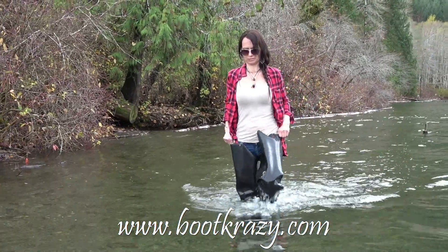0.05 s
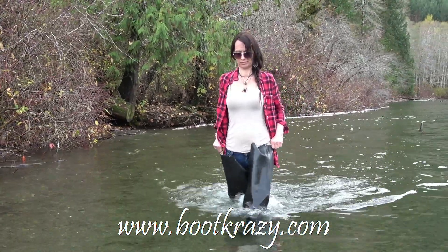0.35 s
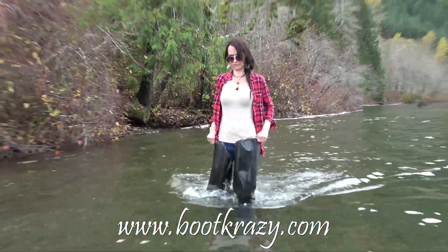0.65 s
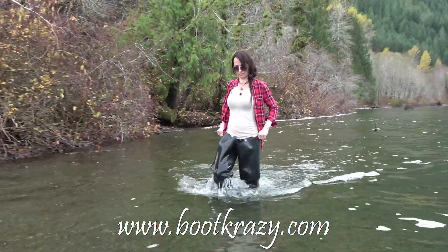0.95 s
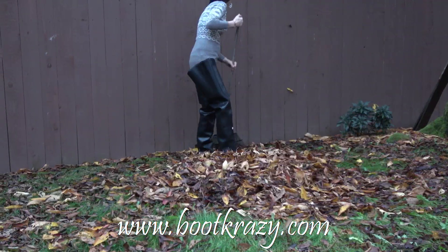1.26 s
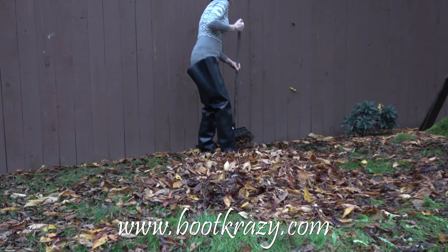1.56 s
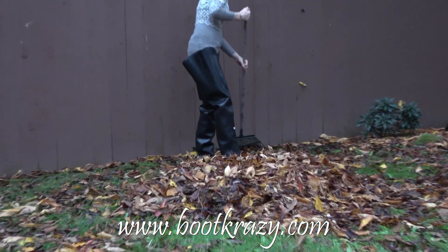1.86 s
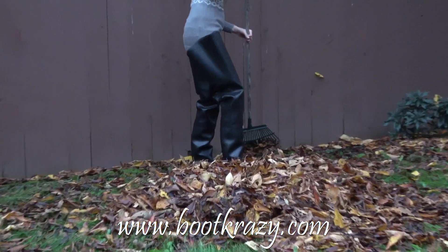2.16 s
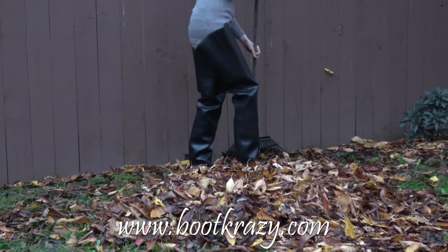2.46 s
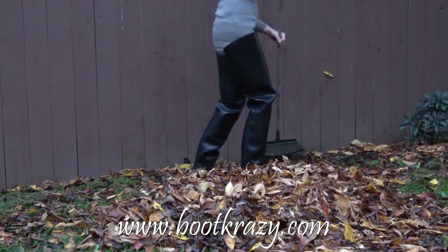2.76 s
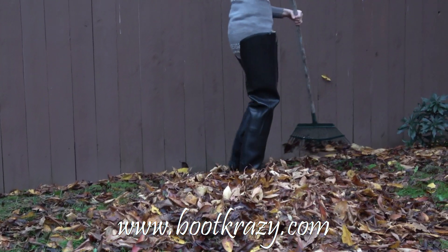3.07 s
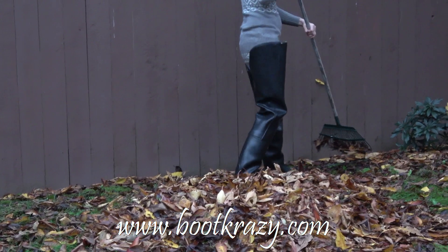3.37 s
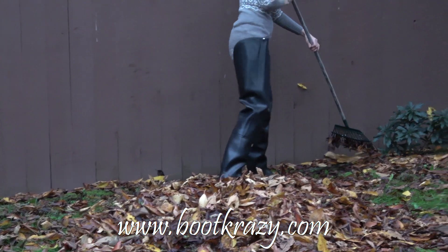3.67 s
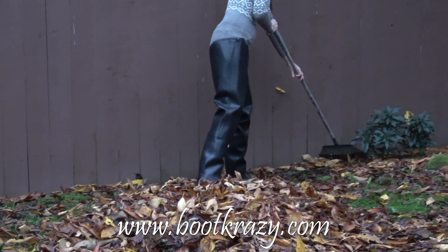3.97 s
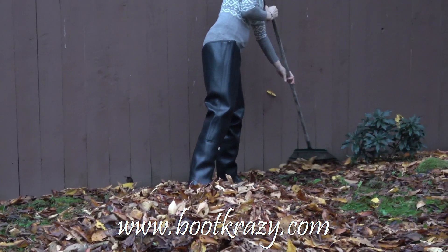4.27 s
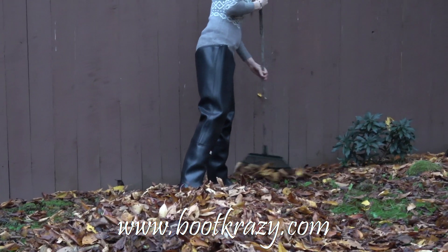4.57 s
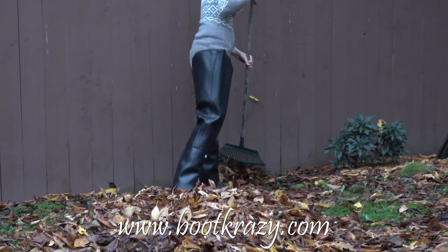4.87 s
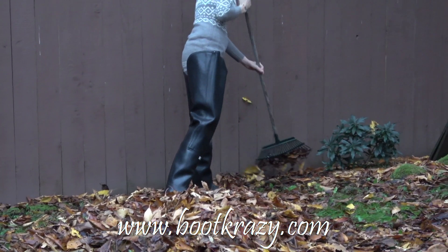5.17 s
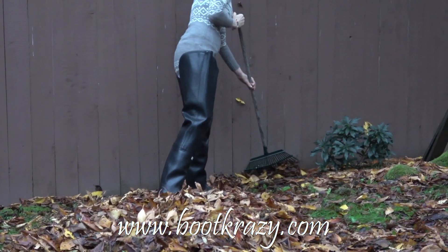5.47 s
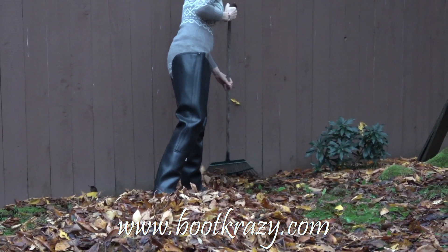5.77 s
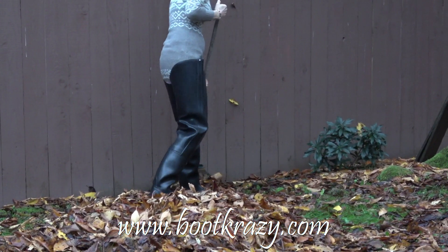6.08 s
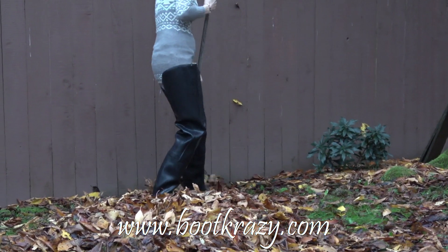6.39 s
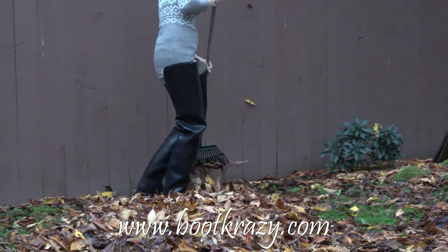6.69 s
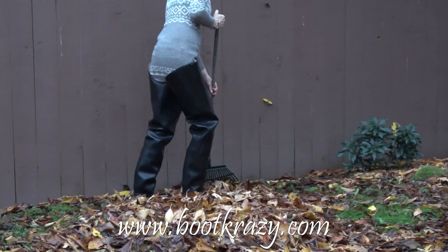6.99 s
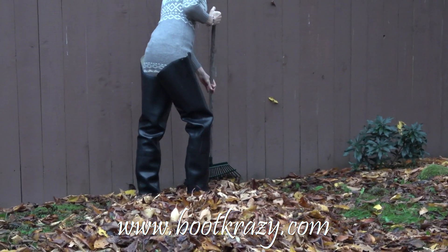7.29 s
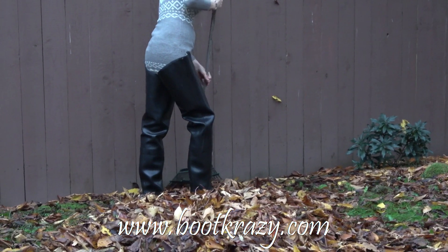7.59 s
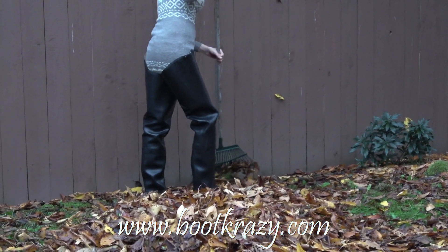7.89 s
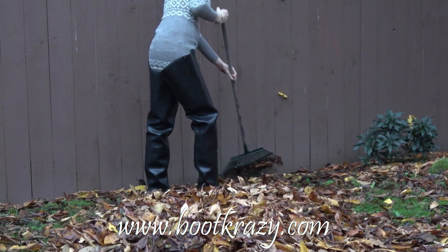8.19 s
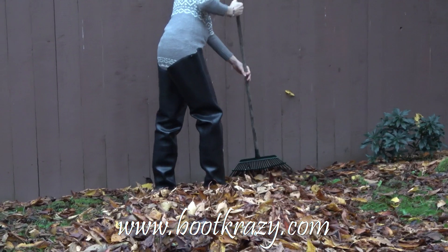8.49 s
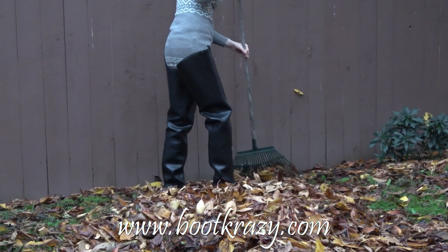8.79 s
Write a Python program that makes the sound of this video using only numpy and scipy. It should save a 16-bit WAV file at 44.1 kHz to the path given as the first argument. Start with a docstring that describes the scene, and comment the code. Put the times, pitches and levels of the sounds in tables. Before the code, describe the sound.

Brief splashing of legs wading through water, then a rake scraping through dry leaves in uneven strokes outdoors.

```python
"""First someone wades through a shallow river: trapped bubbles ring, spray flies and drops fall back.
After a second the scene cuts to a yard, where air rushes over a faint distant hum. A fan rake is
dragged through dry leaves in uneven strokes: leaves fracture, tines chatter, snap free and scrape
the soil. Between strokes the rake head and rubber boots land in the litter, once with a low boom.
To the end, a wooden fence reflects the work."""
import sys
import numpy as np
from scipy import signal
from scipy.fft import rfft, irfft, next_fast_len
from scipy.io import wavfile
from scipy.ndimage import uniform_filter1d

SR = 44100
rng = np.random.default_rng(int(sys.argv[2]) if len(sys.argv) > 2 else 0)


def master_out(mix):
    """Clip the mix to full scale and print it as 16-bit PCM to the path in sys.argv[1]."""
    frames = np.transpose(np.atleast_2d(mix))
    ceiling = np.clip(frames, -1, 1)
    pcm = np.round(ceiling * 32767).astype(np.int16)
    wavfile.write(sys.argv[1], SR, pcm)


N = 394254
TIME = np.arange(N) / SR
CUT_S, EDGE_HZ = 1.05, 15850  # end of the river scene; upper band limit

# Spectra of distant air, churned water and spray: f/Hz, level/dB
AIR_SPECTRUM = [(12, -29), (20, -13), (53, 1), (133, -5.5), (172, -10.5), (335, -13.5), (510, -13),
                (637, -8), (996, -18.5), (1250, -13.5), (1350, -21), (1650, -22), (1890, -27.5),
                (10100, -33), (15800, -44)]
CHURN_SPECTRUM = [(41, -41), (70, -11), (146, -1), (277, -3.5), (417, -6), (499, -1), (1520, -5),
                  (1850, -11), (2560, -3.5), (2830, -17), (3500, -28), (4550, -34), (7700, -120)]
SPRAY_SPECTRUM = [(1880, -3), (3200, -1.5), (5040, -10), (7130, -11), (9070, -14.5), (13500, -20.5),
                  (15800, -27)]
# Spectra of raked leaves, scraped soil, struck soil and crushed litter: f/Hz, level/dB
LEAF_SPECTRUM = [(1940, -57), (3300, -7), (3550, -11.5), (4370, 3), (4950, -4), (5540, 1), (7680, 0.5),
                 (11800, -4), (14400, -10.5), (15800, -17)]
SOIL_SPECTRUM = [(65, -49), (110, -26), (167, -5), (403, -14.5), (537, -20), (598, -11), (768, -18.5),
                 (929, -10), (1900, -5.5), (2470, -33), (4180, -120)]
THUD_SPECTRUM = [(40, -22), (110, 2.5), (185, -4.5), (290, -0.5), (450, -21), (900, -20), (2000, -63)]
CRUNCH_SPECTRUM = [(800, -23), (2800, -5.5), (4500, -3.5), (8000, -4.5), (12000, -11.5), (16000, -22)]
# Sound scattered sideways: f/Hz, side minus mid level/dB
RIVER_SIDE = [(60, -27), (110, -20), (200, -16), (380, -19), (700, -20), (1290, -18), (2380, -16),
              (4400, -18.5), (8120, -11), (15000, -32)]
YARD_SIDE = [(60, -25), (110, -14), (200, -13.5), (380, -14.5), (700, -16.5), (1290, -12), (2380, -46),
             (4400, -14), (8120, -8), (15000, -12)]
# Leftward bias, about twice the left minus right level: f/Hz, bias/dB
RIVER_BIAS = [(60, 0.0), (110, -3), (200, 1), (380, 1.5), (700, 5.5), (1290, 1.5), (2380, 5), (4400, 1.0),
              (8120, 1.5), (15000, -1)]
YARD_BIAS = [(60, -0.5), (110, 1.5), (200, -3), (380, 2), (700, 4), (1290, 3.5), (2380, 2), (4400, 0.5),
             (8120, 0.5), (15000, -0.5)]
# Legs pushing water: t/s, nominal churn level/dB, nominal spray level/dB
LEG_PUSHES = [(0.0, -30, -35.5), (0.088, -30.5, -32.5), (0.288, -32, -40), (0.454, -33, -39),
              (0.702, -30.5, -37), (0.856, -30, -31.5), (0.87, -24, -30), (0.912, -30, -35.5),
              (1.04, -27, -30.5)]
# Large bubbles: t/s, level/dB, starting f/Hz
BIG_BUBBLES = [(0.013, -18.5, 590), (.051, -21.5, 480), (.076, -19, 940), (0.123, -21, 447),
               (.262, -24, 676), (.374, -23.5, 264), (.446, -21.5, 624), (.464, -24, 253),
               (0.498, -17.5, 946), (.552, -23, 360), (.609, -16.5, 1470), (.812, -19.5, 646),
               (.865, -18, 1160), (.873, -26, 340), (1.018, -17, 880), (1.031, -18, 1100)]
# Water thrown up by a knee: t/s, level/dB
KNEE_SPURTS = [(.1, -30.5), (.345, -40), (0.534, -33), (.76, -27), (.862, -29)]
# Leaves shifting under boots and the carried rake: middle t/s, duration/s, nominal level/dB
LEAF_SHIFTS = [(1.08, 0.15, -45), (2.161, .15, -47), (2.447, 0.42, -54.5), (2.617, 0.13, -47),
               (3.259, 0.24, -48.5), (3.309, 0.85, -59.5), (5.327, 0.26, -58), (5.618, .21, -45),
               (6.009, .57, -44), (6.45, 0.69, -49.5), (6.833, 0.49, -48), (7.439, 0.29, -45.5),
               (7.624, .07, -38), (7.941, 0.31, -51.5), (8.42, 0.13, -41.5)]
# Modes of a loose rubber boot shaft: nominal f/Hz, level/dB, T60/s
BOOT_MODES = [(56.4, -29, 0.81), (97.7, -24.5, 0.81), (124, -22, 0.24), (175.6, -25.5, 0.43)]
# Modes of the rake head and of the tines: f/Hz, bandwidth/Hz, level/dB
HEAD_MODES = [(703, 210, -9.5), (915, 34, 0.5), (1056, 27, -14), (1296, 18, 3), (1533, 100, -10.5),
              (2100, 72, 2), (2460, 84, -4), (2880, 69, -2), (3376, 57, -15.5)]
TINE_MODES = [(1610, 65, -22), (2128, 110, 1.5), (2415, 65, -1), (2910, 54, 2.5), (3296, 160, 0),
              (3810, 1700, 0), (4400, 80, -29), (5630, 160, 2), (7630, 94, 8.5)]
# Rake head or boot landing: t/s, knock/dB, thud/dB, crunch/dB, cavity/dB, cavity f/Hz, rise/s, T60/s
IMPACTS = [(1.701, -30.5, -29, -28, -42, 2330, 0.012, 0.31),
           (2.466, -45, -38.5, -43, -43.5, 278, 0.016, 0.18),
           (3.868, -33, -45.5, -35.5, -45, 2180, 0.0067, 0.53),
           (3.918, -38, -52, -42, -43, 1270, .004, 0.17), (4.007, -38.5, -54, -46, -47, 2180, 0.0047, 0.11),
           (5.45, -52, -46, -46, -62, 290, .008, 0.71), (5.651, -44, -42, -43, -42, 312, 0.009, 0.66),
           (6.872, -36.5, -40, -39.5, -38, 1010, 0.0045, .29),
           (7.007, -37, -36, -38, -35, 2120, 0.0098, 0.19),
           (8.19, -33.5, -37, -33.5, -40, 730, 0.014, 0.31),
           (8.302, -30.5, -35.5, -30, -32.5, 213, 0.017, 0.15)]
# Caught tines springing free: t/s, relative level/dB, nominal ring re crack/dB, f/Hz
TINE_SNAPS = [(1.8465, -27, -0.5, 3000), (1.9049, -16.5, -3.5, 3100), (2.664, -17, -12, 2690),
              (4.095, -21, -20, 2580), (4.1624, -15.5, -11, 2150), (4.2851, -5.5, -17, 2730),
              (4.3032, -11, -11, 2900), (4.3382, -6.5, -17, 2530), (4.4084, -7.5, -8.5, 2700),
              (4.456, -7, -15, 2940), (4.471, -9.5, -6, 2880), (4.5049, -10.5, -4.5, 3340),
              (4.583, -11.5, -16, 3440), (5.407, -22, -8, 2610), (5.7846, -17, -11.5, 2510),
              (6.311, -40, 5, 2590), (6.854, -42, 0, 2300), (7.471, -9, -10, 2170),
              (7.549, -10.5, -12, 2880), (7.654, -10, -18, 2820), (8.28, -15.5, -23, 1970),
              (8.4044, -23, -10, 2540), (8.4365, -25.5, 0, 2440), (8.6065, -17, -5, 2920)]
# Rake pulls, levels nominal: t/s, rise/s, hold/s, leaves/dB, chatter re leaves/dB, chatter f/Hz, soil/dB
RAKE_PULLS = [(1.13, 0.033, 0.0065, -23, -6, 2670, -44), (1.245, 0.031, 0.0051, -23, -5.5, 3530, -46),
              (1.832, 0.031, .015, -31, -4, 2900, -43.5), (1.884, 0.043, 0.068, -24, -2, 3150, -44.5),
              (2.646, 0.073, 0.02, -20.5, -5, 2730, -46), (4.086, .01, .14, -30, -6, 2376, -41.5),
              (4.158, 0.11, 0.15, -24.5, -4.5, 2620, -36), (4.455, 0.014, 0.025, -27.5, -4, 2950, -35),
              (4.565, 0.044, 0.071, -21.5, -5.5, 3430, -41.5),
              (5.383, 0.016, 0.057, -40, -2.5, 2480, -51.5),
              (5.582, 0.14, 0.0036, -27.5, -2.5, 2640, -37.5), (7.466, 0.0063, .09, -20.5, -8, 2860, -46),
              (7.633, 0.032, 0.074, -21.5, -12, 3160, -45), (8.426, 0.063, .006, -22.5, -3.5, 2290, -47),
              (8.599, 0.03, 0.0052, -22, -3.5, 3150, -46)]


def amp(db):
    """Amplitude ratio of a level in decibels."""
    return 10 ** (np.asarray(db) / 20)


def unit(x):
    """Normalisation to rms 1."""
    return x / np.sqrt(np.mean(x ** 2) + 1e-20)


def add(mix, s, sound):
    """Superposition of a sound starting at time s."""
    part = mix[max(round(s * SR), 0):][:len(sound)]
    part += sound[:len(part)]


def colour(x, points, share=1):
    """Spectral shaping by (f/Hz, level/dB) points; share scales the levels."""
    hz, db = np.transpose(points)
    size = next_fast_len(len(x) + 2048)
    f = np.fft.rfftfreq(size, 1 / SR)
    gain = amp(share * np.interp(np.log(f + 1), np.log(hz + 1), db))
    return irfft(rfft(x, size) * gain, size)[:len(x)]


def band(x, lo_hz, hi_hz):
    """Steep band-pass filtering."""
    return signal.sosfilt(signal.butter(4, [lo_hz, hi_hz], "band", fs=SR, output="sos"), x)


def ring(x, modes):
    """Forced vibration as a sum of modes (f/Hz, bandwidth/Hz, level/dB) of alternating sign."""
    return sum((-1) ** k * amp(db) * signal.lfilter(*signal.iirpeak(hz, hz / width, SR), x)
               for k, (hz, width, db) in enumerate(modes))


def resonate(x, hz, width_hz):
    """A damped resonator whose natural frequency follows the curve hz."""
    phasor = np.exp(2j * np.pi * np.cumsum(hz) / SR)
    pole = np.exp(-np.pi * width_hz / SR)
    return 2 * (phasor * signal.lfilter([1 - pole], [1, -pole], x / phasor)).real


def fade(t, t60):
    """Exponential decay by 60 dB in t60."""
    return np.exp(-np.log(1000) * t / t60)


def steady(x, size=1100):
    """Division by the running rms keeps the fine grain but holds the level at 1."""
    return x / np.sqrt(abs(uniform_filter1d(uniform_filter1d(x ** 2, size), size)) + 1e-12)


def wander(rate_hz):
    """Random modulation of rms 1, mostly below the given rate."""
    values = rng.standard_normal(N // 100)
    return unit(np.interp(TIME * 2 * rate_hz, np.arange(len(values)), values))


def crackle(n, per_s, spread_db, burst_s, count=600):
    """Shot noise: tiny bursts of very uneven size, each with its own pitch and decay."""
    t = TIME[:200]
    pitch, length = rng.random((2, count, 1))
    bursts = rng.standard_normal((count, len(t))) + 0.77 * np.sin(2 * np.pi * EDGE_HZ * pitch * t)
    bursts *= np.exp(-t / (burst_s * 6 ** length / 3))
    bursts /= np.linalg.norm(bursts, axis=1)[:, None]
    chance, size, kind = rng.random(n), rng.exponential(1, n), rng.integers(0, count, n)
    at = np.flatnonzero(chance < per_s / SR)
    grains = amp(spread_db * np.minimum(size[at], 4))[:, None] * bursts[kind[at]]
    samples = at[:, None] + np.arange(len(t))
    return unit(np.bincount(samples.ravel(), grains.ravel(), n)[:n])


def air_and_hum(hum_hz=121):
    """Ambient noise: a distant rush of air and a machine tone wavering by phase modulation."""
    hum = np.sqrt(2) * np.sin(2 * np.pi * hum_hz * TIME + 1.1 * wander(5.6))
    rush = unit(colour(rng.standard_normal(N), AIR_SPECTRUM)) * amp(0.5 * wander(1.343))
    return amp(-49.94) * rush + amp(-56) * hum


def scatter(x, t60, count=3):
    """Diffuse reflection: many weak, decaying echoes whose paths change as the source moves."""
    t, out = TIME[TIME < t60], np.zeros(len(x))
    for k in range(count):
        taps = rng.choice([-1., 1.], len(t)) * (rng.random(len(t)) < 0.1) * fade(t, t60)
        share = np.sqrt(2 / count) * np.cos(2 * np.pi * (10 * TIME[:len(x)] + k / count))
        out += share * signal.oaconvolve(x, taps / np.linalg.norm(taps))[:len(x)]
    return out


def stereo(mid, width, bias):
    """Lateral reflections widen the sound; a level difference sets it slightly off centre."""
    side = colour(scatter(mid, t60=0.022), width) + colour(mid, bias, share=0.25) - mid
    return np.array([mid + side, mid - side])


def bubble(hz, t60, glide=0.14):
    """Volume resonance of an air pocket, rising in pitch as it nears the surface."""
    t = np.arange(0, t60, 1 / SR)
    return np.sin(2 * np.pi * hz * t * (1 + glide * t / t60)) * fade(t, t60) * (1 - np.exp(-2 * hz * t))


def wading(bubbles=600, plop_cycles=27):
    """Air entrainment: legs churn ringing bubbles into the water and throw up spray and drops."""
    n, t = round(CUT_S * SR), TIME[:4000]
    times, *levels = np.transpose(LEG_PUSHES)
    churn_db, spray_db = (np.interp(TIME[:n], times, db) for db in levels)
    cloud, plops, thrown = np.zeros((3, n))
    for when, pitch, size, damping in rng.random((bubbles, 4)):
        hz = 200 * 10 ** pitch
        t60 = (0.6 + damping) * 0.04 * np.sqrt(700 / hz)
        add(cloud, when * CUT_S, amp(-14 * np.sqrt(size)) * hz ** 0.7 * bubble(hz, t60))
    for s, db, hz in BIG_BUBBLES:
        add(plops, s, amp(db) * bubble(hz, plop_cycles / hz))
        slap = unit(band(rng.standard_normal(len(t)), 570, 2900)) * fade(t, 0.013)
        add(plops, s, amp(db - 10) * slap)  # the water that traps the bubble
    for s, db in KNEE_SPURTS:
        add(thrown, s, amp(db) * np.minimum(t / 0.0037, 1) * fade(t, 0.15))
    foam = crackle(n, per_s=3500, spread_db=0.98, burst_s=0.00052)
    churn = steady(colour(unit(cloud) + 1.2 * foam, CHURN_SPECTRUM))
    spray = steady(colour(crackle(n, 4000, 2.2, 0.0008), SPRAY_SPECTRUM))
    drops = unit(band(crackle(n, 95, 2.5, 0.001), 4000, 10000))
    surge = colour(rng.standard_normal(n), [(15, -3), (40, -10), (90, 13), (300, -35), (1000, -70)])
    splash = np.hypot(amp(spray_db - 1), thrown) * (spray + amp(-11.5) * drops)
    return amp(churn_db - 2.47) * churn + splash + plops + amp(-57) * unit(surge)


def litter(n):
    """Fracture and friction in leaf litter: returns crackle, raw slips, dry rustle and soil scrape."""
    fractures = crackle(n, 3000, 1.8, 0.0007, count=250)
    slips = crackle(n, 1300, 1.14, 0.00046, count=250) + 0.55 * fractures
    leaves = steady(colour(fractures, LEAF_SPECTRUM))
    rustle = steady(band(slips, 1750, 4390))
    soil = steady(colour(slips, SOIL_SPECTRUM))
    return leaves, slips, rustle, soil


def shifting_leaves(length, db):
    """Light friction: a rustle swells and fades, too weak to excite the tines."""
    swell = signal.windows.hann(round(length * SR)) ** 0.5
    leaves, _, rustle, soil = litter(len(swell))
    return amp(db - 1.15) * swell * (leaves + amp(-4.5) * rustle + amp(-7.5) * soil)


def boot_boom(start_s=1.722):
    """Free vibration of a rubber shaft: its modes sag as it slackens, until the leg damps them."""
    t, out = TIME[:SR // 4], np.zeros(N)
    slowing = t * (1.09 - 0.6 * t)
    shaft = sum(amp(db) * fade(t, t60) * np.sin(2 * np.pi * hz * slowing) for hz, db, t60 in BOOT_MODES)
    add(out, start_s, shaft * np.interp(t, [0, 0.006, 0.115, 0.17], [0, 1, 1, 0]))
    return out


def landings():
    """Impact excitation: a rattling knock, soil thud, leaf crunch and cavity ring decay together."""
    t, out = TIME[:SR // 2], np.zeros(N)
    for s, knock_db, thud_db, crunch_db, cavity_db, hz, rise, t60 in IMPACTS:
        blows = crackle(len(t), 2000, 1.0, 0.00064, count=200)
        rattle = unit(ring(blows, HEAD_MODES)) + 0.49 * unit(band(blows, 380, 2300))
        knock = amp(knock_db) * steady(rattle, size=600)
        thud = amp(thud_db) * steady(colour(rng.standard_normal(len(t)), THUD_SPECTRUM), size=800)
        crunch = amp(crunch_db) * steady(colour(blows, CRUNCH_SPECTRUM))
        cavity = [(hz, 70 + 0.25 * hz, 0)]
        hollow = amp(cavity_db) * steady(ring(ring(blows, cavity), cavity), size=600)
        envelope = np.minimum(t / rise, 1) * fade(np.maximum(t - rise, 0), t60)
        add(out, s, envelope * (knock + thud + crunch + hollow))
    return out


def tine_snaps():
    """Release of elastic energy: a caught tine flicks loose with a crack and rings briefly."""
    t, out = TIME[:2800], np.zeros(N)
    for s, db, ring_db, hz in TINE_SNAPS:
        flick = rng.standard_normal(len(t)) * np.minimum(t / 0.002, 1) * fade(t, 0.039)
        crack = unit(band(flick, 1750, 13300))
        tone = unit(ring(flick, [(hz, 170, 0), (hz * 1.07, 260, -7), (hz * 2.69, 400, -3)]))
        add(out, s, amp(db - 25.5) * (crack + amp(ring_db + 10) * tone))
    return out


def stroke(rise, hold, leaf_db, tine_db, tine_hz, soil_db):
    """Stick-slip friction: the rake bites, drags and lifts, its tines chattering on leaves and soil."""
    sag_db_per_s, release_db_per_s, settle_db_per_s = 13, 249, 42.5
    ring_threshold_db, ring_range_db = -39.5, 17
    t = TIME[:3 * SR // 4]
    lifted = np.maximum(t - rise - hold, 0)
    pull = np.minimum(t / rise, 1) ** 1.17 * amp(-sag_db_per_s * np.clip(t - rise, 0, hold))
    settling = amp(-24 - settle_db_per_s * lifted)  # disturbed leaves go on moving
    effort = pull * np.hypot(amp(-release_db_per_s * lifted), settling)
    level_db = leaf_db + 20 * np.log10(effort + 1e-9)
    press = np.clip((level_db - ring_threshold_db) / ring_range_db, 0, 1)
    leaves, slips, rustle, soil = litter(len(t))
    tines = unit(band(ring(slips, TINE_MODES), 1770, 3960))
    centre_hz = tine_hz + np.minimum(13000 * lifted, 600)  # freed tines ring higher
    bending = steady(resonate(0.84 * rustle + tines, centre_hz, width_hz=790))
    chatter = steady(press * bending + (1 - press) * rustle)
    chatter *= amp(-1.5 * np.minimum(lifted / 0.01, 1))  # weaker off the ground
    loaded = np.array(TINE_MODES) * [rng.uniform(0.95, 1.05), 1, 1]  # other tines carry each stroke
    crush = steady(leaves + 0.34 * press * steady(ring(leaves, loaded)))
    return effort * (amp(leaf_db - 1) * crush + amp(leaf_db + tine_db - 1.44) * chatter
                     + amp(soil_db + 1) * soil)


def raking(clump_db=1.14, clump_hz=54.9, stall_db=-2.5):
    """Strokes and rustles, amplitude-modulated as the leaves give way in small bunches."""
    out, caught = np.zeros((2, N))
    for s, *pull in RAKE_PULLS:
        add(out, s, stroke(*pull))
    for middle, length, db in LEAF_SHIFTS:
        add(out, middle - length / 2, shifting_leaves(length, db))
    for s, *_ in TINE_SNAPS:  # the rake stalls just before a tine lets go
        add(caught, s - 0.018, signal.windows.hann(1100))
    clumps = steady(amp(clump_db * wander(clump_hz)))
    return out * clumps * amp(stall_db * caught)


def scene():
    """Two sound fields in turn: the river, then the yard with reflections from its fence."""
    work = raking() + tine_snaps() + landings()
    fence = amp(-4.5) * scatter(work, t60=0.24)
    yard = stereo(work + fence + boot_boom() + air_and_hum(), YARD_SIDE, YARD_BIAS)
    river = stereo(wading(), RIVER_SIDE, RIVER_BIAS)
    return np.hstack([river, yard[:, river.shape[1]:]])


def record(dry):
    """Band limiting by a linear-phase low-pass filter."""
    lowpass = signal.firwin(511, EDGE_HZ, window=("kaiser", 9), fs=SR)
    return signal.oaconvolve(dry, lowpass[None], "same")


dry = scene()
out = record(dry)
master_out(out)
```